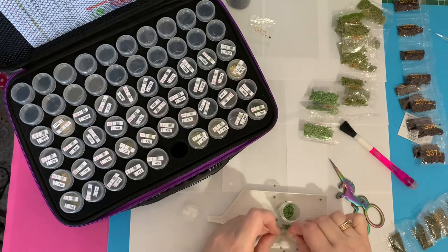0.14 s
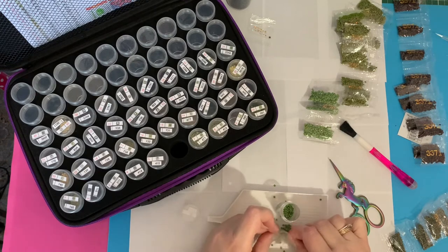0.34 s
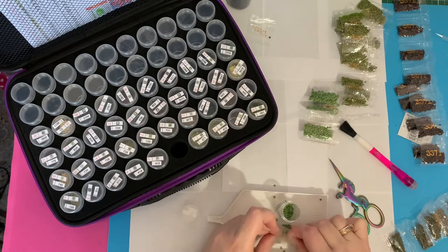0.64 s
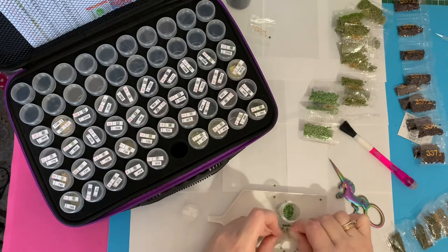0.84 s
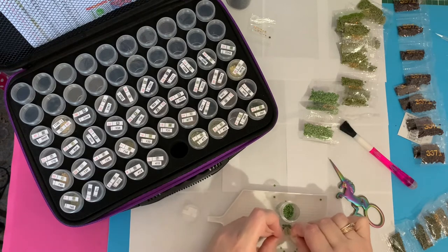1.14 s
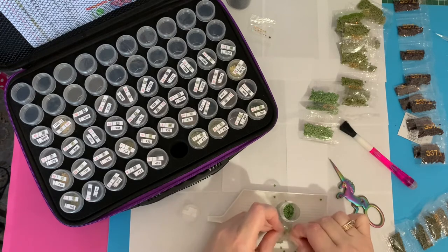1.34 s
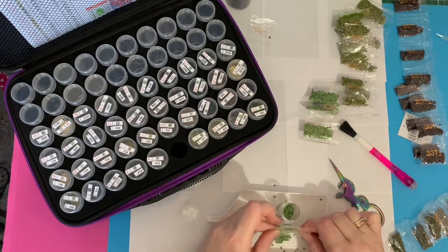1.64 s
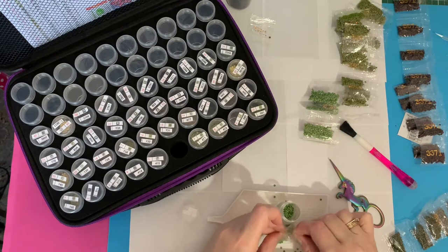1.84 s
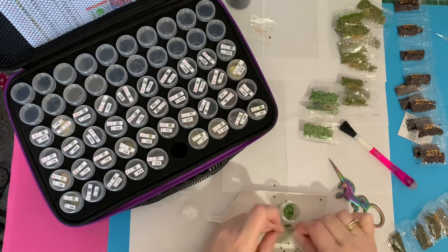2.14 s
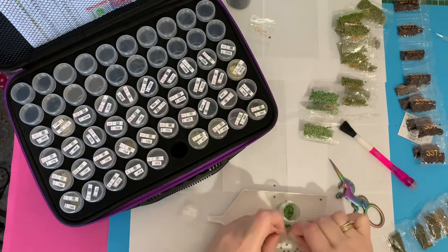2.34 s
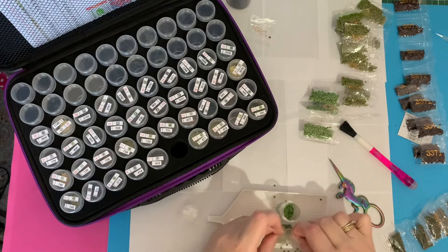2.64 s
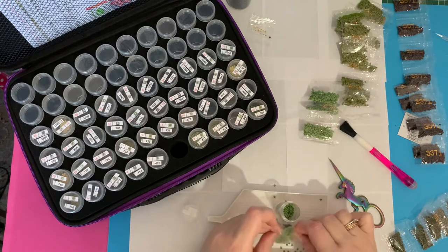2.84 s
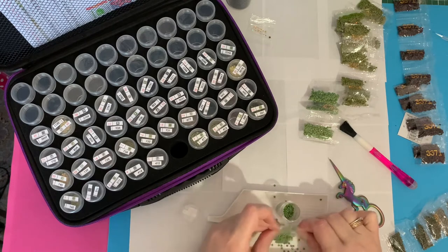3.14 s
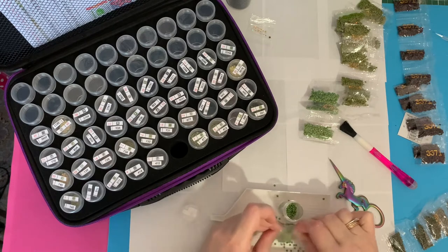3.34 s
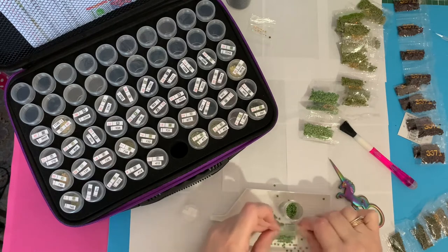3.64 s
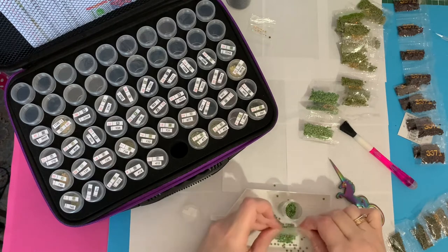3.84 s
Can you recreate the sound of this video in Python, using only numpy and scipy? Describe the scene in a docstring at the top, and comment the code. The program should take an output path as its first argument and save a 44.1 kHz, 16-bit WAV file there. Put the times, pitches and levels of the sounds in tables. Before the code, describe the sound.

Tiny plastic beads rattle quickly and brightly as they are shaken from a crinkling little packet

```python
"""Beads shaken out of a small packet

Tiny plastic beads are shaken and squeezed out of a packet into a pot and tray, on a table near a stereo recorder.
Each shake is a swarm of short noisy bead ticks over a duller swarm of ticks for the rustling film.
Single bead clicks and crisp film snaps are louder ticks; hollow pops are brief fading tones.
The packet thuds softly when it flexes hard. The small, quiet room adds a short tail, faint rumble and hiss."""
import sys
import numpy as np
from scipy import signal
from scipy.fft import rfft, irfft, next_fast_len
from scipy.io import wavfile
from scipy.ndimage import uniform_filter1d

SR = 44100
rng = np.random.default_rng(int(sys.argv[2]) if len(sys.argv) > 2 else 0)


def output_pcm(signal):
    """Save a mono or channel-first signal as 16-bit PCM at the path in sys.argv[1].

    Samples are clipped to [-1, 1] before scaling.
    """
    pcm = np.clip(np.atleast_2d(signal).T, -1, 1) * 32767
    wavfile.write(sys.argv[1], SR, np.round(pcm).astype(np.int16))


N = 176400  # length in samples: 4 s

# Source levels in the tables are relative: each layer has its own gain later. Only the shape of a spectrum counts.
# shakes of the packet: (peak time [s], length [s], bead rattle level [dB], film rustle level [dB])
SHAKES = [(0.0, 0.063, -27.5, -51.5), (0.125, 0.51, -38.5, -59), (0.213, 0.21, -37, -66),
          (0.285, 0.23, -33.5, -48), (0.434, 0.23, -31.5, -53), (0.562, 0.22, -30.5, -47),
          (0.705, 0.38, -34.5, -55), (0.721, 0.092, -30.5, -46.5), (0.848, 0.19, -34, -50),
          (0.959, 0.21, -29.5, -50.5), (1.104, 0.25, -42, -55.5), (1.25, 0.2, -35.5, -53),
          (1.335, 0.011, -30, -46), (1.413, 0.26, -36, -50.5), (1.549, 0.16, -45.5, -60.5),
          (1.661, 0.21, -47.5, -61), (1.729, 0.25, -37, -56.5), (1.838, 0.11, -45, -57.5),
          (1.905, 0.12, -27.5, -50), (1.998, 0.33, -38, -51), (2.075, 0.089, -29.5, -52.5),
          (2.148, 0.14, -36, -51.5), (2.226, 0.12, -30.5, -52.5), (2.301, 0.13, -38, -50),
          (2.365, 0.086, -32.5, -55.5), (2.464, 0.2, -39.5, -54), (2.529, 0.13, -38, -57.5),
          (2.632, 0.057, -35, -52.5), (2.709, 0.28, -40.5, -54.5), (2.786, 0.094, -34, -54.5),
          (2.86, 0.21, -37, -50), (2.941, 0.09, -30, -48), (3.041, 0.25, -35.5, -49.5),
          (3.111, 0.067, -28.5, -47.5), (3.215, 0.23, -35.5, -49.5), (3.284, 0.088, -34, -51),
          (3.39, 0.27, -34.5, -49.5), (3.45, 0.1, -34, -49.5), (3.544, 0.14, -37, -49),
          (3.612, 0.08, -29.5, -48), (3.685, 0.086, -35.5, -51), (3.727, 0.11, -31, -45.5),
          (3.792, 0.11, -41, -50), (3.903, 0.27, -46, -56)]
# spectrum of hard contacts, both beads and film snaps: (frequency [Hz], density [dB per Hz])
BEAD_SPECTRUM = [(200,-33),(900,-26),(2000,-11),(3200,-12),(4500,-7),(6000,-6.5),(7300,-2.5),(8400,1),(9600,-3.5),(12000,3.5),(14000,-0.5),(16000,-10)]

RISE_SHARE, EDGE_DB = 0.31, -27.5  # share of a stroke spent swelling; level at its two ends, against the peak
SNAP_TILT_DB = 6  # extra treble of a snap
POP_T60 = .025  # T60: time to fade by 60 dB, in seconds
FLOOR_DB = -74
# contacts per second at the strongest moment, spread of their strengths, fade time [s]
BEADS_PER_S, BEAD_SPREAD_DB, BEAD_T60 = 2800, 4, 0.0034
CREASES_PER_S, CREASE_SPREAD_DB, FILM_T60 = 900, 2, .012
CLICK_T60, CLICK_LENGTH_S, USUAL_CLICK_DB = .0042, .003, -31  # fade time [s] at the usual level
BEAD_ROOM_DB, FILM_ROOM_DB = -7.5, -13  # how much of each goes into the room tail
CUTOFF_HZ = 16050
# each contact rings briefly at a pitch of its own
RING_DB, RING_WIDTH_HZ, RING_RANGE_HZ = 10, 170, (2200, 8000)
HARDNESS, TILT_RANGE_HZ = .12, (7000, 12000)  # dB of treble per dB of force; where the treble tilt starts and is full
CROWDING = .8  # contacts per second grow with the level of the stroke, to this power
COLOUR_DB = 3.3  # random unevenness of each contact's spectrum
CRACK_DB, CRACK_T60 = -8, .0008  # the hard crack at the start of a contact; fade time [s]
BEAD_DB, FILM_DB, FLEX_DB = -3.5, 0.58, 1.5  # layer gains
CLICK_DB, SNAP_DB = -1, -1.5


def amp(db):
    """Turns decibels into gain."""
    return 10 ** (np.asarray(db) / 20)


def read(points, hz):
    """Reads a table between its points, on a log-frequency axis."""
    f, value = np.transpose(points)
    return np.interp(np.log(hz + 1), np.log(f), value)


def add(mix, s, sound):
    """Mixes a stereo sound in at a time in seconds."""
    part = mix[:, max(round(s * SR), 0):][:, :sound.shape[1]]
    part += sound[:, :part.shape[1]]


def at_mics(pair, spectrum):
    """Colours two unrelated signals and blends them into what the two microphones hear; keeps the power."""
    # how alike the two microphones are: (frequency [Hz], likeness [0 to 1])
    likeness = [(60,0.95),(1200,0.52),(4000,0.66),(7200,0.27),(9700,1),(16000,0.67)]
    # loudness balance: (frequency [Hz], left minus right [dB])
    balance_db = [(380,0),(700,-4),(3300,-0.5),(4500,2.5),(7500,-0.5)]
    # which side hears it first: (frequency [Hz], lead of the left [ms])
    lead_ms = [(1000,0.17),(2000,-0.27),(3400,-0.16),(4300,0.21),(5800,0.317),(16000,0.201)]
    size = next_fast_len(pair.shape[1] + 4096)
    hz = np.fft.rfftfreq(size, 1 / SR)
    a, b = rfft(pair, size)
    same = np.clip(read(likeness, hz), 0, 1)
    side = amp(read(balance_db, hz) / 2)
    lag = np.exp(-2j * np.pi * hz * read(lead_ms, hz) / 1000)
    left, right = a, lag * (same * a + np.sqrt(1 - same ** 2) * b)
    colour = amp(read(spectrum, hz)) * (hz < CUTOFF_HZ + 500) * np.array([side, 1 / side])
    colour = colour / np.sqrt(np.mean(colour ** 2))
    return irfft(np.array([left, right]) * colour, size)[:, :pair.shape[1]]


def tick(t60, tilt_db=0):
    """One contact: a hard crack, a brief noise burst and near reflections, with its own colour and ring; energy 1."""
    # reflections off the table and the case: (delay [s], level [dB])
    bounces = [(.0013,-1),(.0032,-11)]
    t = np.arange(1024) / SR
    power = amp(-60 * t / t60) ** 2 + amp(CRACK_DB - 60 * t / CRACK_T60) ** 2
    for delay, db in bounces:
        power = power + (t >= delay) * amp(db - 60 * abs(t - delay) / t60) ** 2

    hz = abs(np.fft.fftfreq(len(t), 1 / SR))
    place = np.sqrt(hz / hz.max())
    tone_db = COLOUR_DB * np.interp(place, np.linspace(0, 1, 40), rng.standard_normal(40))
    ring_hz = rng.uniform(*RING_RANGE_HZ)
    tone_db += RING_DB / (1 + ((hz - ring_hz) / RING_WIDTH_HZ) ** 2)
    tone_db += tilt_db * np.interp(hz, TILT_RANGE_HZ, [0, 1])
    # minimum phase: the filter responds at once, with no sound ahead of the contact
    tone = np.exp(np.conj(signal.hilbert(np.log(amp(tone_db)))))[:len(t) // 2 + 1]

    burst = rng.standard_normal((2, len(t))) * np.sqrt(power)
    z = rfft(burst) * tone
    heard = irfft(z * (hz[:z.shape[1]] < CUTOFF_HZ))  # only energy below the cutoff counts
    return irfft(z) / np.linalg.norm(heard, axis=1, keepdims=True)


def swells(rows):
    """Level over time of strokes (peak s, length s, dB) that set in quickly, round off and die away."""
    t, power = np.arange(0, N, 16) / SR, 1e-12
    for peak, length, db in rows:
        u = (t - peak) / length
        rise, fall = abs(u / RISE_SHARE) ** 1.5, u / (1 - RISE_SHARE)
        away = np.where(u < 0, rise, fall)
        power = power + amp(db + EDGE_DB * away) ** 2
    return np.interp(np.arange(N) / SR, t, np.sqrt(power))


def swarm(level, per_s, spread_db, t60, count=200):
    """Random contacts that share the energy of the stroke: crowded and bright when hard, sparse and dull when gentle.
    Only a few pieces collide at any moment, so the colour keeps shifting."""
    rate = per_s * (level / level.max()) ** CROWDING
    happens = rng.random(N) < rate / SR
    size = amp(spread_db * np.minimum(rng.exponential(1, N), 4)) * happens
    # divide by the energy of the contacts nearby, so that the sum follows the level
    local = uniform_filter1d(uniform_filter1d(size ** 2, 560), 300)
    size = size * level / np.sqrt(abs(local) + 1e-6)
    # one tick sound per short stretch of time, as bright as the force there
    force_db = 20 * np.log10(level[::N // count] / level.max())
    ticks = [tick(t60, HARDNESS * db) for db in force_db]
    kind = np.arange(N) * count // N + rng.integers(-2, 3, N)
    kind = np.clip(kind, 0, count - 1)
    out = np.zeros((2, N))
    for i in np.flatnonzero(size):
        add(out, i / SR, size[i] * ticks[kind[i]])
    return out


def contacts(rows, tilt_db):
    """Single hard contacts (s, dB); the harder ones chatter longer."""
    out = np.zeros((2, N))
    for s, db in rows:
        t60 = CLICK_T60 * np.sqrt(amp(db - USUAL_CLICK_DB))
        strength = amp(db) * np.sqrt(CLICK_LENGTH_S * SR)  # the energy of this level held for the click length
        add(out, s, strength * tick(t60, tilt_db))
    return at_mics(out, BEAD_SPECTRUM)


def background():
    """Room rumble and hiss: steady noise, strongest in the bass."""
    # (frequency [Hz], density [dB per Hz])
    floor_spectrum = [(20,-36),(55,0),(100,-4.5),(160,-10.5),(1000,-24),(16000,-42)]
    return amp(FLOOR_DB) * at_mics(rng.standard_normal((2, N)), floor_spectrum)


def room(x):
    """Adds up many faint echoes as a short diffuse noise tail whose treble dies first."""
    # fade time of the tail: (frequency [Hz], time to fade by 60 dB [s])
    room_t60 = [(1300,0.18),(4000,0.18),(16000,0.015)]
    hz, t, z = signal.stft(rng.standard_normal((2, SR // 2)), SR, nperseg=256)
    fade = amp(-60 * t / read(room_t60, hz)[:, None])
    tail = signal.istft(z * fade, SR, nperseg=256)[1]
    tail = tail * np.minimum(np.arange(tail.shape[1]) / SR / 0.0051, 1)  # builds up over 5.1 ms
    return signal.fftconvolve(x, tail / np.linalg.norm(tail[0]), axes=1)[:, :N]


def flex_thuds():
    """The packet flexes between the fingers: a low swarm of contacts makes each soft thud."""
    # (peak time [s], length [s], level [dB])
    flexes = [(.305,0.083,-61.5),(.573,0.065,-62.5),(.722,0.06,-65),(.975,0.069,-64),(1.335,0.028,-58.5),(2.952,0.087,-63.5),(3.735,0.09,-62.5)]
    # (frequency [Hz], density [dB per Hz])
    flex_spectrum = [(40,-13),(250,-0.5),(450,10),(700,-2.5),(4000,-58)]
    return at_mics(swarm(swells(flexes), per_s=910, spread_db=11.5, t60=0.031), flex_spectrum)


def film_rustle():
    """The film creases with each shake: many small ticks that fade more slowly than the beads."""
    # (frequency [Hz], density [dB per Hz])
    film_spectrum = [(120,-33.5),(600,-11.5),(950,-2.5),(1250,0),(1750,-9),(2400,-2),(7000,-15)]
    level = swells([(s, length, db) for s, length, _, db in SHAKES])
    return at_mics(swarm(level, CREASES_PER_S, CREASE_SPREAD_DB, FILM_T60), film_spectrum)


def pops():
    """The wall of the packet buckles with a short hollow note."""
    # (time [s], level [dB], pitch [Hz])
    pop_list = [(.72,-42,1260),(.951,-39,1250),(2.892,-40,1200),(3.553,-34,1114)]
    t, out = np.arange(SR // 10) / SR, np.zeros((2, N))
    for s, db, hz in pop_list:
        onset = np.minimum(t * hz / 2, 1)  # swells over two cycles
        note = np.sin(2 * np.pi * hz * t + rng.random((2, 1)))
        add(out, s, onset * amp(db - 60 * t / POP_T60) * note)
    return out


def film_snaps():
    """Crisp snaps of the film: single contacts with extra treble."""
    # (time [s], level [dB])
    snap_list = [(.1267,-30.5),(.3416,-32.5),(.46,-31.5),(.6149,-31),(.6463,-32),(.7599,-31.5),
                 (.8526,-27.5),(1.4468,-30),(1.5546,-33),(1.7624,-35),(2.0595,-30.5),(2.1992,-29.5),(2.2939,-26.5),
                 (2.369,-27),(2.4228,-35),(2.8922,-31),(3.6018,-34),(3.7802,-33.5),(3.8202,-35.5),(3.8556,-41),(3.9105,-38)]
    return contacts(snap_list, SNAP_TILT_DB)


def bead_clicks():
    """Single beads strike the pot, each with one hard contact."""
    # (time [s], level [dB])
    click_list = [(0.0159, -32.5), (0.1973, -33.5), (0.2591, -25.5), (0.2825, -30.5), (0.433, -30.5),
                  (0.4809, -32.5), (0.521, -31.0), (0.5644, -30.0), (0.5743, -24.0), (0.7754, -37.5),
                  (0.8201, -29.5), (0.8749, -32.0), (0.9793, -28.5), (1.051, -37.5), (1.0971, -29.5),
                  (1.1304, -32.5), (1.2389, -34.5), (1.2586, -27.0), (1.3314, -26.5), (1.3717, -34.0),
                  (1.4759, -33.5), (1.5294, -41.5), (1.6614, -40.0), (1.9403, -33.0), (1.9845, -33.5),
                  (2.0091, -30.0), (2.0755, -26.5), (2.1545, -29.5), (2.2257, -28.0), (2.4274, -33.5),
                  (2.5275, -29.0), (2.6413, -29.0), (2.6877, -32.0), (2.7233, -31.0), (2.7498, -37.5),
                  (2.7838, -25.5), (2.8002, -31.0), (2.9498, -30.5), (2.9688, -35.0), (3.0135, -29.0),
                  (3.1752, -33.0), (3.2886, -24.5), (3.3789, -29.0), (3.4598, -20.5), (3.4745, -30.0),
                  (3.5109, -34.0), (3.6122, -30.0), (3.844, -40.0), (3.8854, -39.0)]
    return contacts(click_list, 0)


def beads():
    """Beads knock against each other and the pot with each shake: a dense swarm of very short ticks."""
    level = swells([(s, length, db) for s, length, db, _ in SHAKES])
    return at_mics(swarm(level, BEADS_PER_S, BEAD_SPREAD_DB, BEAD_T60), BEAD_SPECTRUM)


def scene():
    """Beads and packet, in the room."""
    soft = amp(FILM_DB) * film_rustle() + amp(FLEX_DB) * flex_thuds() + pops()
    hard = amp(BEAD_DB) * beads() + amp(CLICK_DB) * bead_clicks() + amp(SNAP_DB) * film_snaps()
    echoes = room(amp(BEAD_ROOM_DB) * hard + amp(FILM_ROOM_DB) * soft)
    return background() + echoes + soft + hard


def record(dry):
    """The recorder's band limit: a steep filter takes away everything above the cutoff."""
    low_pass = signal.firwin(401, CUTOFF_HZ, window=("kaiser", 8), fs=SR)
    return signal.oaconvolve(dry, low_pass[None], "same")


dry = scene()
out = record(dry)
output_pcm(out)
```